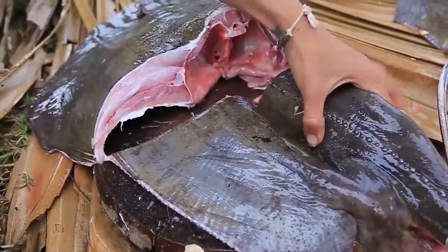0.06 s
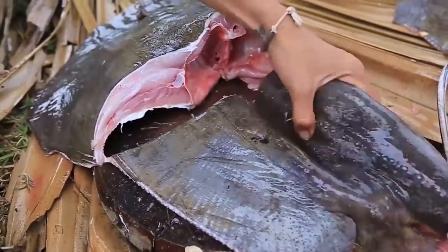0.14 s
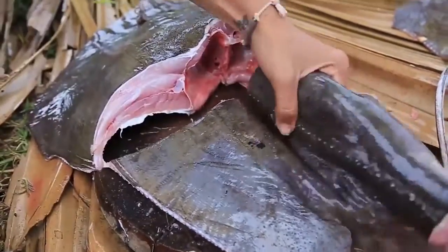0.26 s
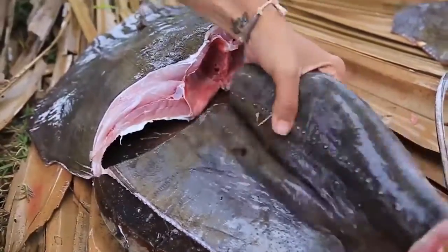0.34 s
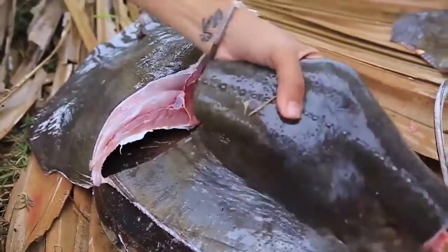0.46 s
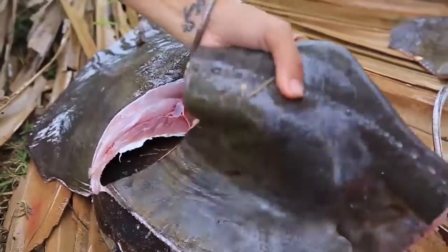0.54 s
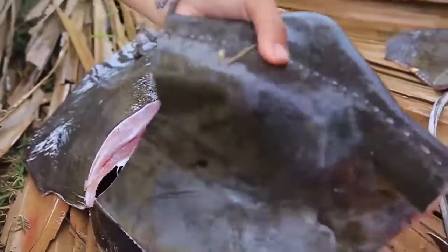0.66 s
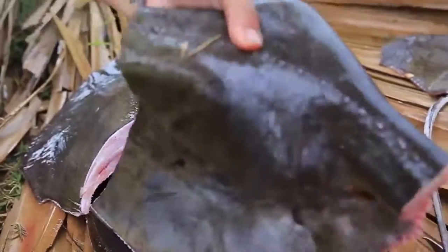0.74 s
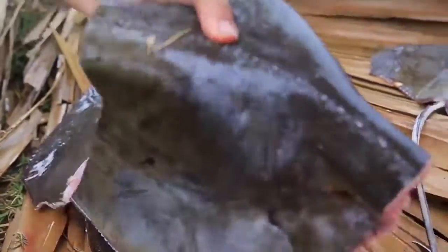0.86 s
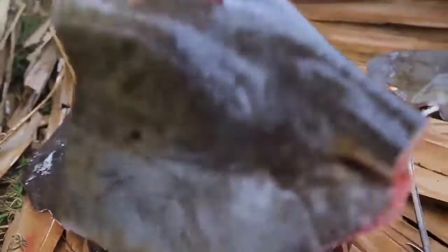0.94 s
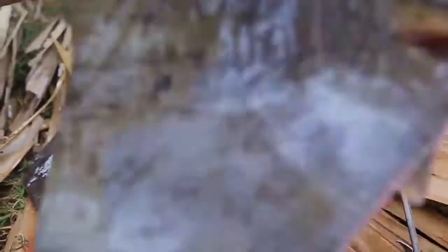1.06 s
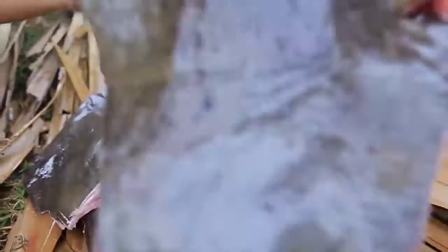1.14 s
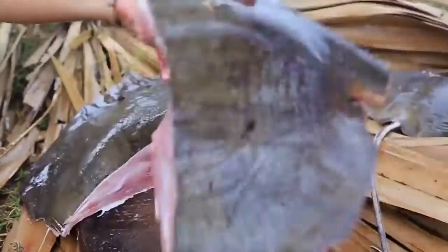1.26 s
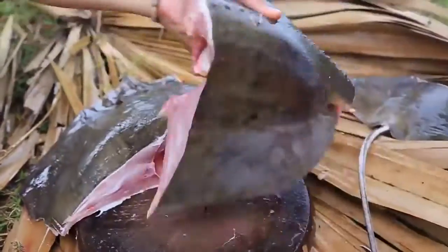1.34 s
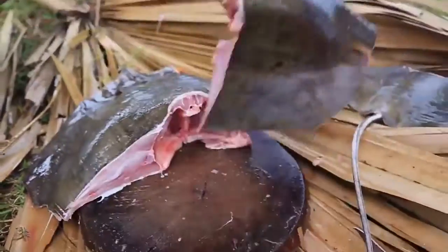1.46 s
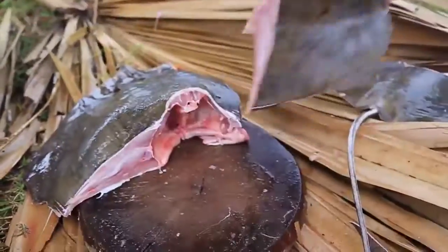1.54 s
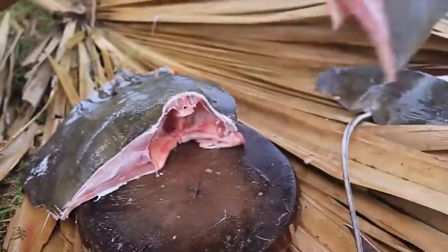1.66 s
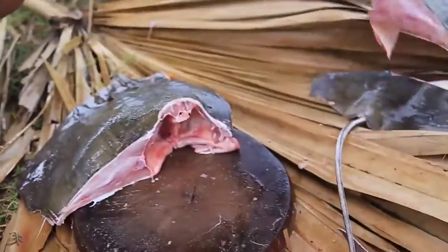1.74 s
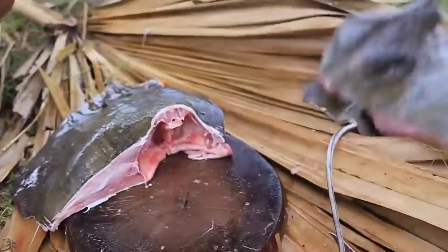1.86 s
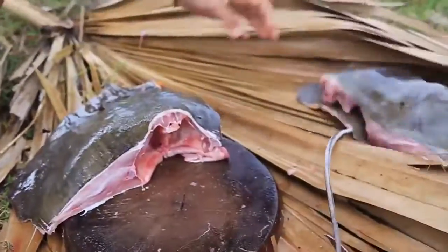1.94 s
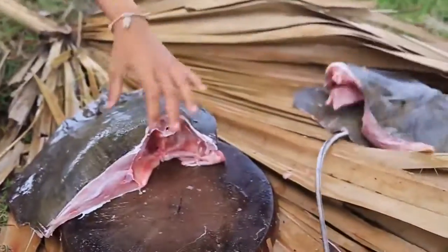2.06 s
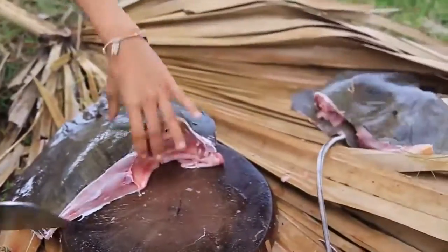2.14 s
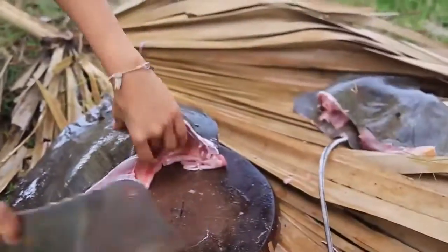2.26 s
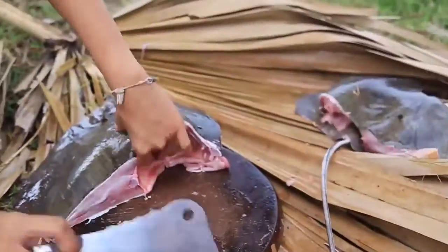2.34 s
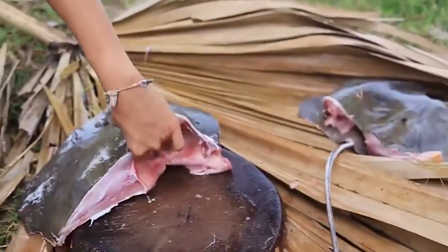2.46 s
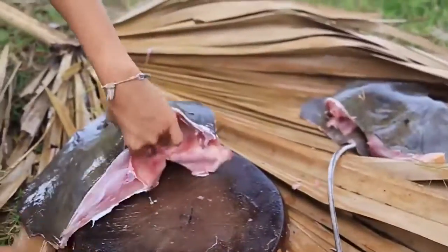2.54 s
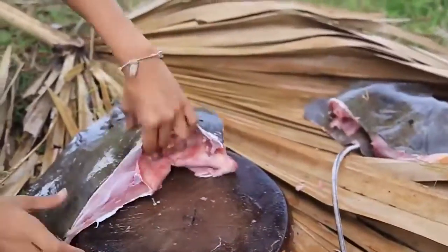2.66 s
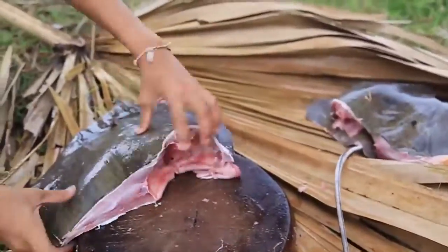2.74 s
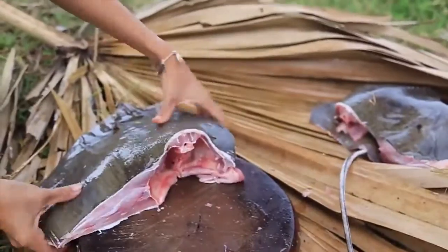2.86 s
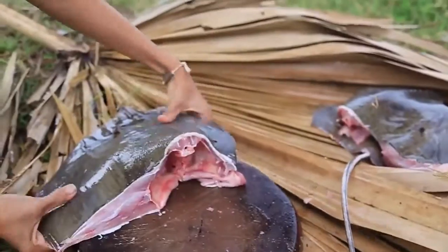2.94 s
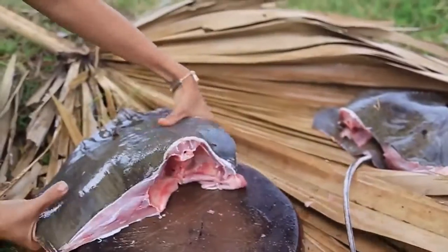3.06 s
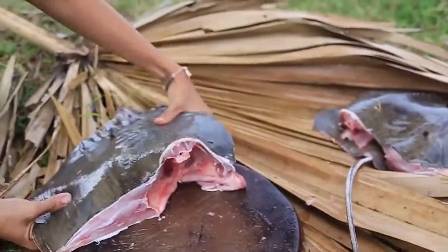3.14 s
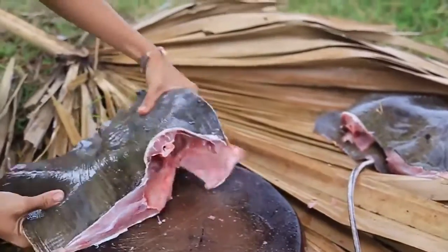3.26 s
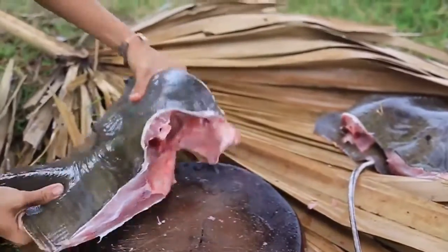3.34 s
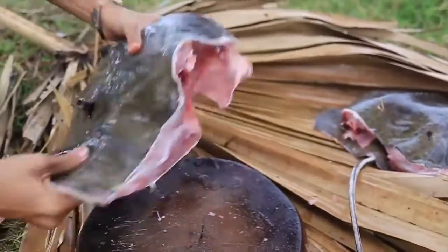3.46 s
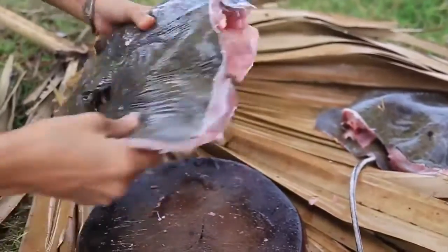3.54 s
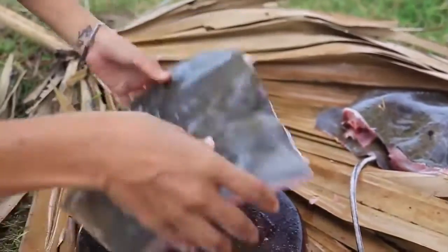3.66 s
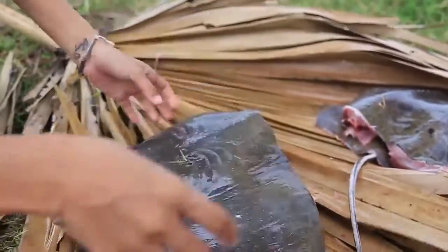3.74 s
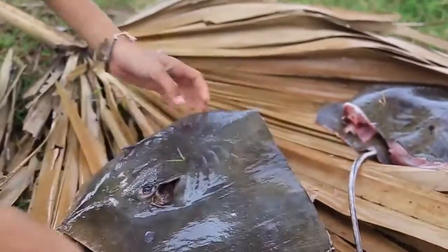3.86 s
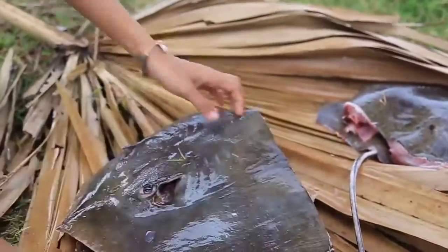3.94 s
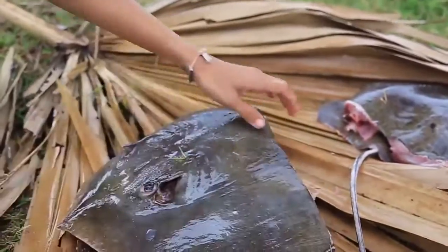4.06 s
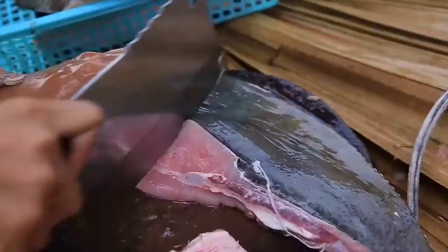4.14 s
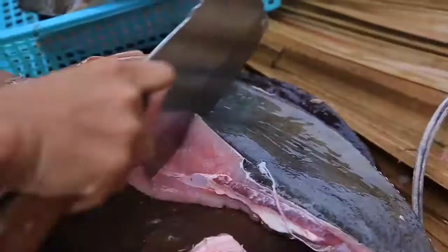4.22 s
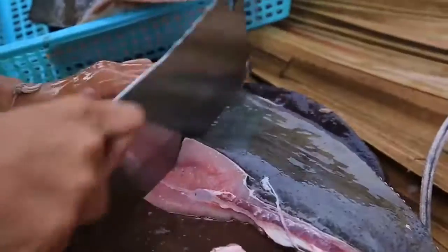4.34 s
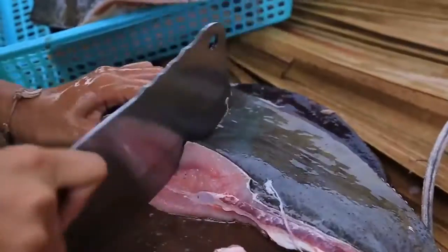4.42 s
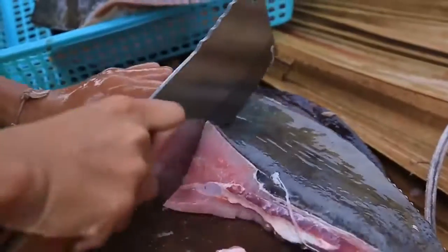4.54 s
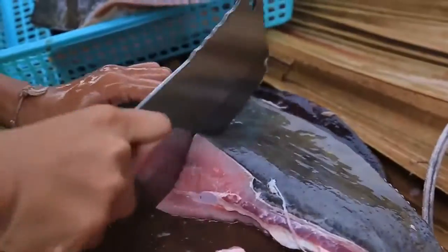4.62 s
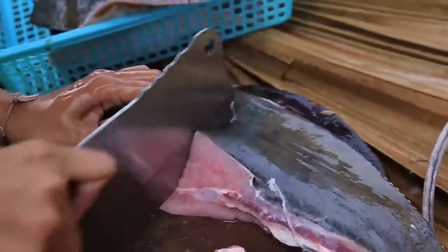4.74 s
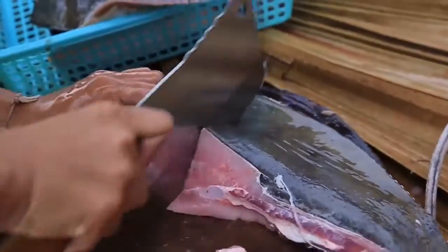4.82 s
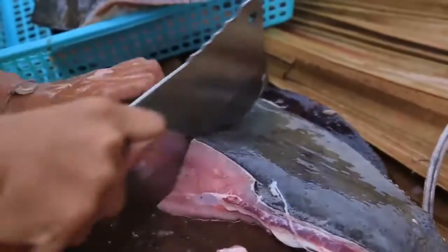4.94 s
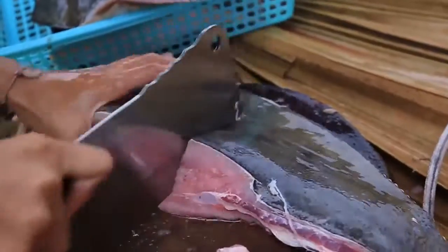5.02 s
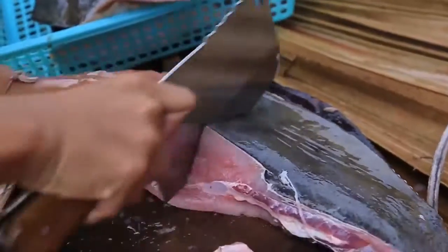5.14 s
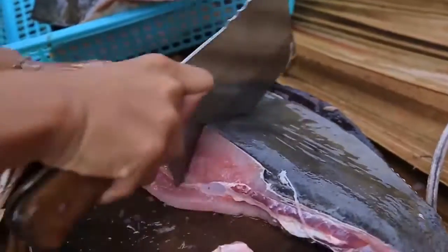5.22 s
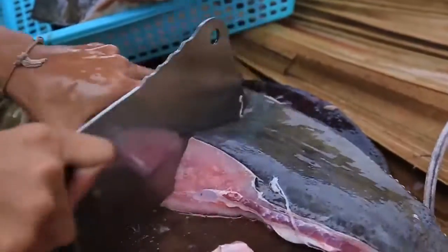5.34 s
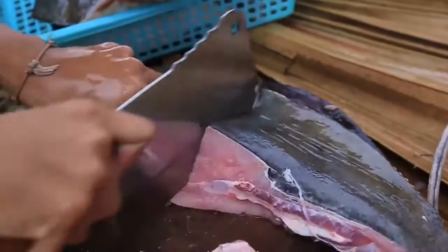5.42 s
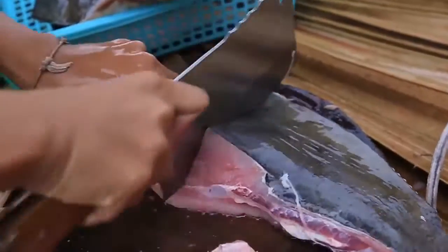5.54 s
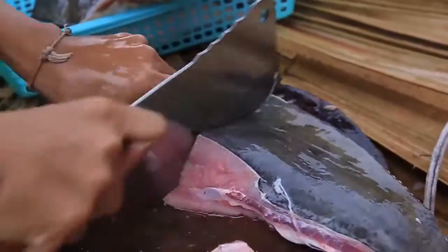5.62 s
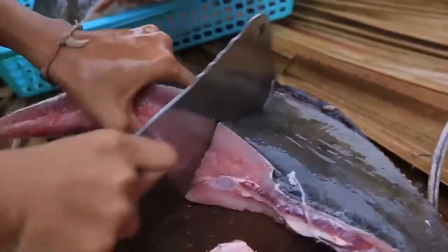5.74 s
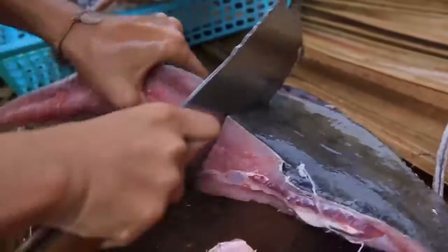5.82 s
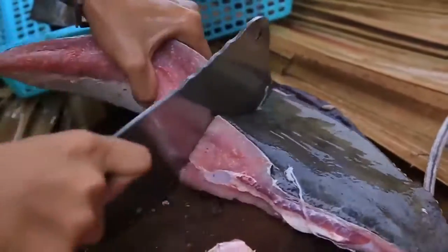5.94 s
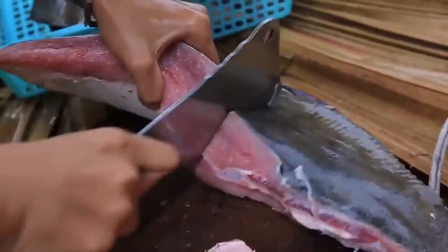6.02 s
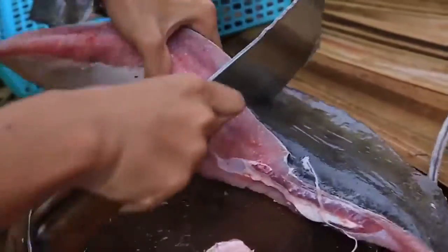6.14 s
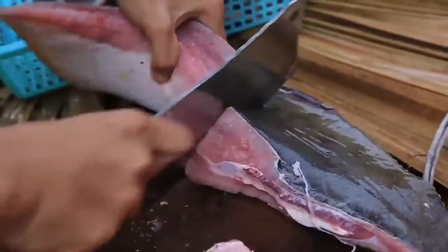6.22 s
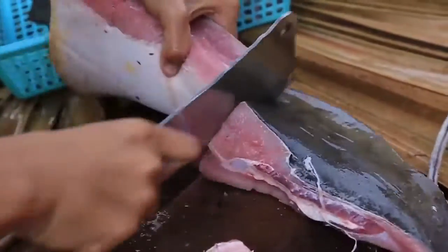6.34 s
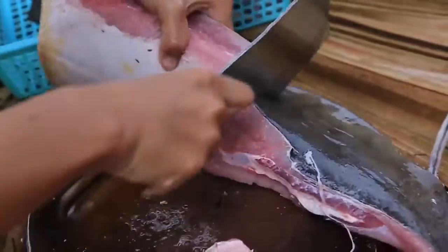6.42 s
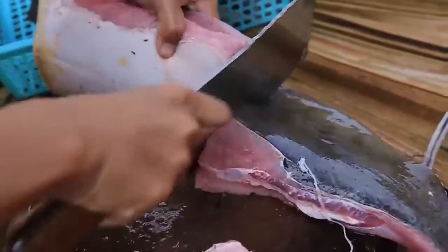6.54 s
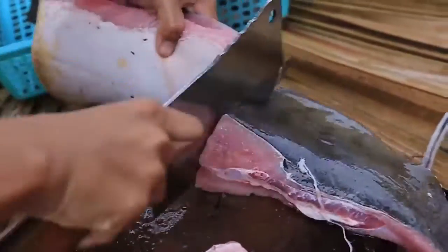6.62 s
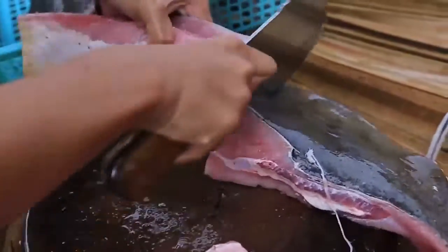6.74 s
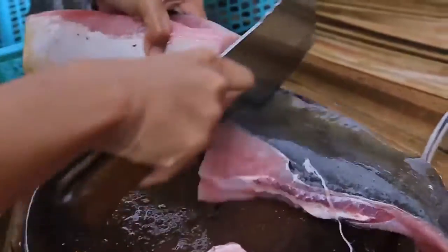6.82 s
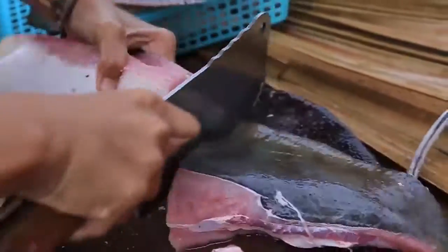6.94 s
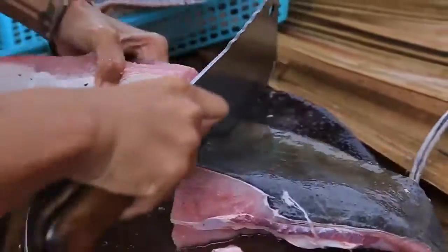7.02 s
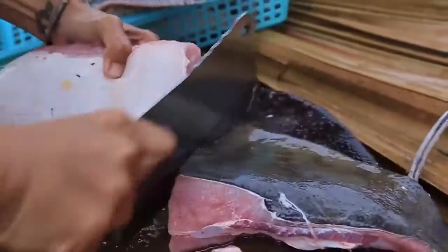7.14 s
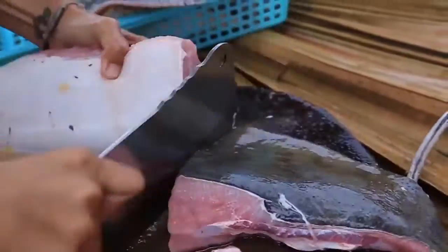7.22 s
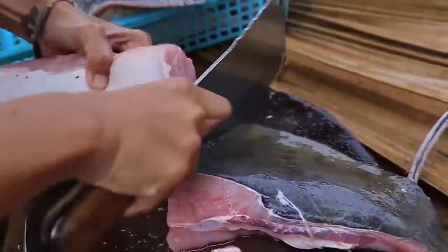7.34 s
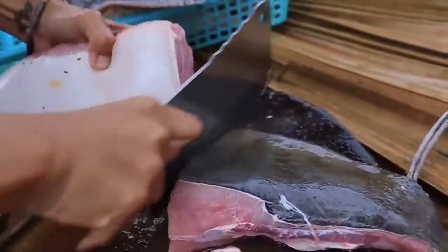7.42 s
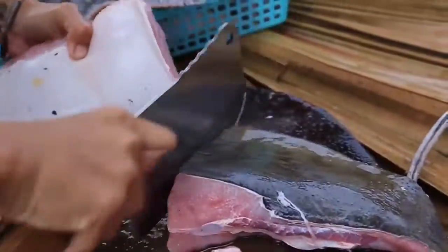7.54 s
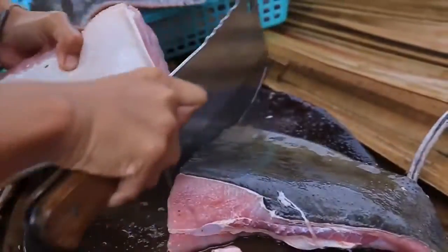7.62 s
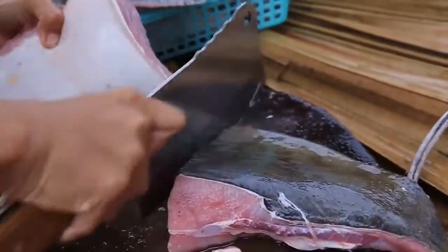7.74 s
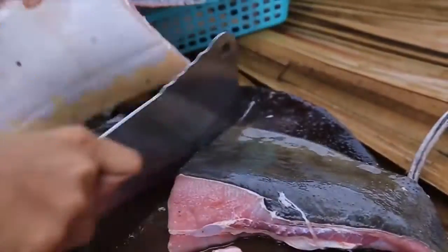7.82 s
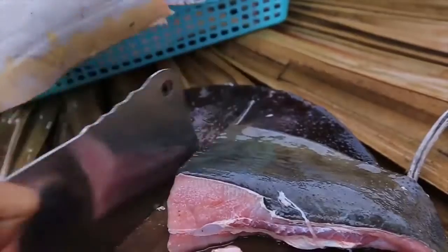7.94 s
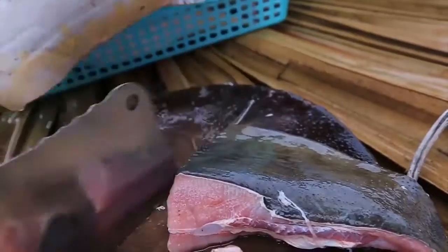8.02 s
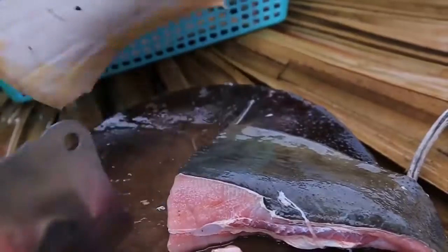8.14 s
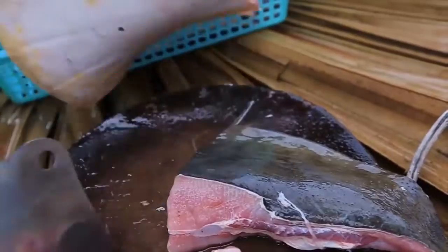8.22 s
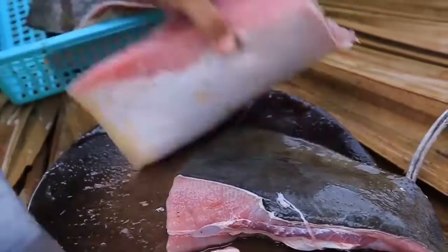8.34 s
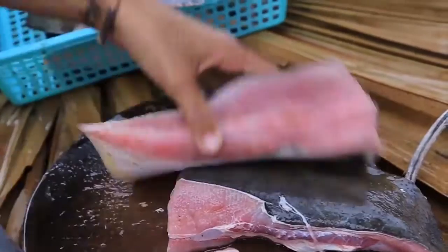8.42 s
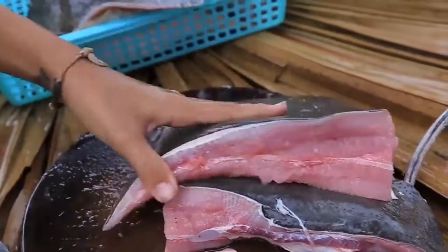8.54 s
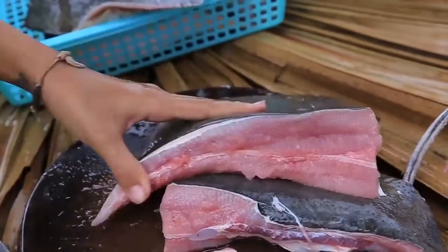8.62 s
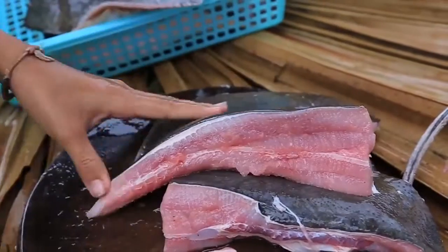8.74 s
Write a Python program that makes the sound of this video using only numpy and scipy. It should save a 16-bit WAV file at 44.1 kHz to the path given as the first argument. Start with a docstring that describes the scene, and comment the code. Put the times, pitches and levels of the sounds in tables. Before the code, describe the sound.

Outdoors, close to a single microphone, a large wet fish is handled on a wooden block among dry palm leaves. For the first second its skin squelches, with small pops and ticks. Loud, sharp slaps with bursts of leaf crackle come at about 2.0, 2.6, 3.1 and 3.8 seconds, with a brief steel clink at 2.6. At 4.2 the sound cuts out for an instant. Then a cleaver saws through skin and flesh in gritty, hissing strokes, about six or seven a second, dotted with sharp clicks. From 7.2 the strokes grow louder, with more ringing steel and wood, ending in a longer slide around 8. A wet slab slaps down at 8.5. Low wind buffets the microphone throughout, strongest at the start and around 3 seconds. Farther off are an engine's hum, faint insects and a few small bird chirps, early and near the end.

```python
"""Outdoors, at a wooden block among dry palm leaves; one microphone, near-mono in two channels.
Close by, a large wet fish is handled: leaves crackle, skin squelches and pops, slabs slap the wood.
After a short cut to silence a cleaver saws through skin in quick strokes, its friction ringing
steel and block, and slides off the wood. Wind buffets the microphone throughout;
farther off are an engine's hum, insects and small birds."""
import sys
import numpy as np
from scipy import signal
from scipy.fft import rfft, irfft, next_fast_len
from scipy.io import wavfile
from scipy.ndimage import uniform_filter1d, map_coordinates

SR = 44100
rng = np.random.default_rng(int(sys.argv[2]) if len(sys.argv) > 2 else 0)


def master(y):
    """Save y as 16-bit WAV."""
    cut = np.clip(np.atleast_2d(y).T, -1, 1)
    pcm = np.round(cut * 32767)  # scale
    wavfile.write(sys.argv[1], SR, pcm.astype(np.int16))


N = 386757
TIME = np.arange(N) / SR
SLOW_TIME = np.arange(0, N + 16, 16) / SR  # coarse grid for levels
HIT_TIME = np.arange(SR // 8) / SR  # time since a contact
SILENCE_S, SAWING_S, SLIDE_S = (4.186, 4.250), (4.2, 8.2), (7.85, 8.18)  # slide: the last long draw


def amp(db):
    return 10 ** (np.asarray(db) / 20)


def unit(x):
    return x / np.sqrt(np.mean(x ** 2) + 1e-20)


def filtered(x, response):
    """x through a response given as a function of frequency."""
    m = next_fast_len(len(x) + 8192)
    return irfft(rfft(x, m) * response(np.fft.rfftfreq(m, 1 / SR)), m)[:len(x)]


def noise(response, n=N):
    """Coloured noise, rms 1."""
    return unit(filtered(rng.standard_normal(n), response))


def shape(points):
    """Response through (f/Hz, level/dB) points on a log axis."""
    f, db = np.transpose(points)
    return lambda hz: amp(np.interp(np.log(hz + 1), np.log(f + 1), db))


def modes(table, widen=0.87):
    """Response of (f/Hz, nominal width/Hz, level/dB) resonances, alternating in sign."""
    return lambda f: sum(
        (-1) ** k * amp(db) * 1j * f * width * widen / (hz * hz - f * f + 1j * f * width * widen)
        for k, (hz, width, db) in enumerate(table))


def phase(hz):
    return 2 * np.pi * np.cumsum(hz) / SR


def wobble(rate):
    """A smooth random curve, rate knots a second."""
    return map_coordinates(rng.standard_normal(int(N * rate / SR) + 4), [TIME * rate])


def grit(rate, spread_db, share, lumpy_db):
    """Noise with sharp grains and fast lumps, rms 1."""
    size = amp(spread_db * np.minimum(rng.exponential(size=N), 2))
    grains = (rng.random(N) < rate / SR) * size * rng.standard_normal(N)
    mix = np.sqrt(share) * unit(grains) + np.sqrt(1 - share) * rng.standard_normal(N)
    return unit(mix * amp(lumpy_db * wobble(70)))


def patchy(x, depth_db, bins, frames):
    """x with random gain patches in frequency and time, rms 1."""
    spectrum = signal.stft(x, nperseg=256)[2]
    patches = uniform_filter1d(rng.standard_normal(spectrum.shape), bins, 0)
    patches = unit(uniform_filter1d(patches, frames, 1))
    return unit(signal.istft(spectrum * amp(depth_db * patches), nperseg=256)[1][:N])


def per_sample(rows):
    return [np.interp(TIME, SLOW_TIME, row) for row in rows]


def add(track, s, sound):
    """Mixes a sound in at time s."""
    span = track[round(s * SR):][:len(sound)]
    span += sound[:len(span)]


# Wind at the microphone and hum in the distance: t/s, wind level/dB, hum level/dB
WIND_AND_HUM = [(0.0, -33, -45), (0.12, -32, -43), (0.88, -41.5, -47), (1.83, -46, -42), (1.88, -47.5, -55),
                (3.03, -30, -43.5), (3.83, -42.5, -43.5), (4.47, -37, -48.5), (4.88, -48, -48.5),
                (8.55, -45.5, -45), (8.77, -41, -46.5)]
# Engine orders: f/Hz, nominal width/Hz, level/dB
HUM_ORDERS = [(67.4, 7.4, 1.5), (133.4, 3.7, -5.5), (174.5, 18, -6)]

def wind_and_hum():
    """Wind buffets the microphone over the narrow rumble bands of a far engine."""
    s, wind_db, hum_db = np.transpose(WIND_AND_HUM)
    buffets = noise(shape([(8, -36), (22, 26), (45, 7), (80, -29.5)]))
    wind = unit(buffets * amp(0.58 * wobble(7.3)))
    hum = noise(modes(HUM_ORDERS))
    return amp(np.interp(TIME, s, wind_db)) * wind + amp(np.interp(TIME, s, hum_db)) * hum


# Insect bands, applied twice over: f/Hz, nominal width/Hz, level/dB
INSECT_BANDS = [(4200, 200, -4), (5360, 450, 1), (5900, 250, 0), (9800, 1100, -2), (13300, 800, -5)]
# Open-air ambience: f/Hz, level/dB
FIELD_SPECTRUM = [(29, -31), (50, -4), (141, -3), (222, -13), (276, -12), (436, -34), (610, -29),
                  (919, -40), (1040, -31), (1140, -37), (2780, -41), (6930, -47), (9470, -44), (12500, -52),
                  (15700, -49)]

def field_and_insects():
    """The field all around: a gently wavering hiss with thin bands of insects."""
    insects = noise(lambda hz: modes(INSECT_BANDS)(hz) ** 2)
    field = patchy(rng.standard_normal(N), depth_db=1.5, bins=6, frames=10)
    field = filtered(field, shape(FIELD_SPECTRUM))
    field /= np.std(filtered(field, lambda hz: hz > 230))  # the part above the rumble sets the level
    return amp(-56 + wobble(2.57)) * field + amp(-66 + 2.2 * wobble(3)) * insects


# The fish gripped, dragged and dropped, close by:
# peak t/s, crackle level/dB, 10 dB rise/ms, 10 dB fall/ms, squelch/dB re crackle
RUSTLES = [(0.022, -44.5, 16, 25, -1.5), (0.265, -40, 39, 25, -3.5), (0.36, -39.5, 27, 21, -1.5),
           (0.425, -40, 7, 29, -8), (0.52, -49, 33, 350, -1.5), (1.068, -41, 69, 20, -6),
           (1.998, -18, 11, 18, -7), (2.025, -21.5, 26, 12.5, -1.5), (2.055, -28.5, 8, 84, -4),
           (2.187, -36.5, 18, 55, -7), (2.273, -44.5, 23, 20, -6), (2.525, -29, 3, 98, -14),
           (2.587, -23.5, 40, 7, -8.5), (2.63, -29, 28, 97, -9), (2.8, -40.5, 33, 97, -1.5),
           (3.0, -41, 14, 13, 0.5), (3.037, -38.5, 2.5, 66, 8), (3.067, -36, 13, 11, 11),
           (3.11, -41.5, 28, 50, -12), (3.197, -34, 21, 24, 1), (3.238, -37, 32, 47, -1.5),
           (3.395, -35.5, 5.5, 17, -3), (3.812, -30, 7, 12, 2.5), (3.837, -22.5, 7.5, 9.5, 5),
           (3.87, -33, 22, 95, -4.5), (4.178, -41.5, 3, 19, -11), (8.56, -43.5, 23.5, 18, 2)]
# Dry palm leaves: f/Hz, level/dB
LEAF_SPECTRUM = [(880, -20), (1500, -4), (2390, -8.5), (2970, -8.5), (6960, -13), (10200, -9), (16000, -31)]

def handling():
    """Leaves crackle and wet flesh squelches: steep swells that linger over a faint bed."""
    power = amp(2 * np.array([[-56], [-60.5]]))  # the bed: crackle, squelch
    for s, db, rise_ms, fall_ms, wet_db in RUSTLES:
        ms = 1000 * np.abs(SLOW_TIME - s)
        lost_db = 10 * np.where(SLOW_TIME < s, (ms / rise_ms) ** 1.5, (ms / fall_ms) ** 0.85)
        power = power + amp(2 * np.array([db - lost_db, db + wet_db - lost_db]))
    crackle_db, squelch_db = per_sample(10 * np.log10(power))
    grains = grit(rate=1500, spread_db=5.5, share=0.36, lumpy_db=2)
    grains = patchy(grains, depth_db=3, bins=4, frames=8)
    grains *= (TIME < SAWING_S[0]) | (TIME > SAWING_S[1])  # the leaves lie still during the sawing
    crackle = unit(filtered(grains, shape(LEAF_SPECTRUM)))
    treble = filtered(crackle, lambda hz: 1 / (1 + (6000 / (hz + 1)) ** 4))
    dulling = np.clip((-22.5 - crackle_db) / 24, 0, 1)  # gentle rustling is duller than a crash
    squelch = unit(filtered(grains, modes([(570, 350, 0.62), (1200, 217, 2)])))
    return amp(crackle_db) * (crackle - dulling * treble) + amp(squelch_db) * squelch


# Pops in the skin and one squeak of the blade: t/s, level/dB, f/Hz, length/ms
POPS = [(0.017, -35.5, 3340, 5), (0.019, -26, 1240, 6.5), (0.085, -37, 2350, 5), (0.0932, -24.5, 1010, 5),
        (0.11, -31, 880, 8.8), (0.262, -29, 886, 16), (0.325, -28.5, 1170, 6.4), (0.374, -27.5, 1110, 6.4),
        (0.485, -27.5, 913, 14), (0.5107, -19, 1790, 2.6), (0.5455, -33, 1500, 4),
        (0.552, -30.5, 1020, 8.7), (1.519, -31, 2170, 9.1), (2.743, -25, 2760, 5.1), (2.998, -35, 900, 7),
        (5.46, -21.5, 3300, 4), (7.57, -26.5, 2900, 37), (7.766, -27.5, 740, 8.7)]

def pops():
    """Air pockets pop in wet skin: soft-edged tones that swell early and climb a little."""
    out = np.zeros(N)
    for s, db, hz, ms in POPS:
        progress = np.linspace(0, 1, int(ms * SR / 1000))
        swell = np.sin(np.pi * progress ** 0.41) ** 2
        pitch = hz * (1 + 0.07 * (progress - 0.5))
        add(out, s, amp(db) * swell * np.sin(phase(pitch)))
    return out


def crack_band(hz):
    """The treble response of a contact's crack."""
    return 1j * hz / (3000 + 1j * hz) * (9000 / (9000 + 1j * hz)) ** 3


# Small contacts around the block: t/s, level/dB, f/Hz, nominal crack/dB re ring
TICKS = [(0.03, -35, 10200, -10.5), (0.093, -35, 3100, -9), (0.336, -22.5, 2140, -10),
         (0.36, -31, 14500, -4), (0.29, -30, 3140, -10), (0.417, -20.5, 8900, -13.5),
         (0.432, -24.5, 4670, -11), (0.456, -27.5, 1640, -12), (0.511, -32, 4150, -10),
         (0.533, -37, 9600, -10), (0.549, -33.5, 11000, -5), (0.6463, -32, 9000, -14.5),
         (0.68, -34, 8800, -12), (1.057, -25, 1730, -7), (1.234, -34, 5050, 1.5),
         (2.222, -25.5, 2020, -9.5), (2.518, -32.5, 2280, 1.5), (2.549, -10, 2620, -18.5),
         (2.787, -27, 970, -13), (3.197, -23, 800, -12), (3.254, -23, 3900, -19.5),
         (3.28, -32.5, 9080, -10), (3.333, -26, 1970, -10), (3.353, -27, 2200, -17.5),
         (3.393, -27.5, 2180, -10), (3.397, -23.5, 4430, -4), (3.409, -30, 4360, -2), (3.93, -28, 904, -11),
         (4.176, -28.5, 1560, -12), (4.609, -22, 10300, -6), (4.704, -27.5, 9500, -26.5),
         (4.868, -23.5, 2850, -3.5), (4.99, -36, 10000, -8.5), (5.008, -31.5, 7000, -9.5),
         (5.768, -24, 10600, -9), (5.799, -32, 3000, -7), (5.82, -18.5, 9100, -7.5), (6.28, -22, 6750, -13),
         (6.29, -20, 10200, -6), (6.412, -29, 4760, -9.5), (6.7, -18, 10100, -16), (6.768, -29, 790, -17),
         (7.232, -14, 5900, -12.5), (7.359, -34, 1370, -12), (7.507, -21.5, 1780, -10),
         (7.526, -20, 7950, -5.5), (7.537, -24, 3000, -1), (7.543, -11.5, 8200, -8.5),
         (8.184, -36, 2200, -6), (8.528, -26, 6000, -9), (8.534, -21.5, 5000, -12.5)]

def ticks():
    """Leaf, skin and blade tick: a few cycles and a crack that dulls far above their pitch."""
    out, t = np.zeros(N), HIT_TIME
    faint = [(s, rng.normal(-44, 3), min(3500 * 2 ** rng.normal(), SR / 4), -8)
             for s in rng.uniform(0, SLIDE_S[1], 45)]
    for s, db, hz, crack_db in TICKS + faint:
        ring = amp(-60 * t / (0.0036 + 14 / hz)) * np.sin(2 * np.pi * hz * t)
        burst = noise(lambda f: crack_band(f) / (1 + 1j * f / (6.2 * hz)) ** 2, len(t))
        crack = amp(crack_db + 4.5 - 60 * t / 0.01) * burst
        add(out, s, amp(db) * (ring + crack))
    return out


# A bird far off: t/s, length/s, start f/Hz, end f/Hz, level/dB
CHIRPS = [(0.835, 0.14, 5900, 4490, -45), (1.411, 0.1, 5860, 4080, -44)]

def bird_chirps():
    """Husky falling chirps: noise sidebands blur the pitch."""
    out = np.zeros(N)
    for s, length, start_hz, end_hz, db in CHIRPS:
        n = int(length * SR)
        husk = unit(uniform_filter1d(rng.standard_normal(n), size=18))
        glide = np.sin(phase(np.linspace(start_hz, end_hz, n)))
        add(out, s, amp(db) * np.hanning(n) * husk * glide)
    return out


# Small birds, faint at the microphone, one list of points a note: t/s, f/Hz, level/dB
BIRD_NOTES = [
    [(1.9, 4300, -58), (1.97, 4200, -58)],
    [(7.73, 8500, -58), (7.78, 7600, -54), (7.82, 6400, -57)],
    [(8.21, 7900, -66), (8.27, 8400, -63), (8.33, 8700, -64), (8.35, 7800, -64)],
    [(8.38, 8000, -65), (8.42, 8700, -64), (8.46, 7900, -66)],
    [(8.58, 8500, -66), (8.63, 7900, -64), (8.7, 7100, -67)],
]

def bird_whistles():
    """Thin whistles glide from point to point."""
    out = np.zeros(N)
    for note in BIRD_NOTES:
        s, hz, db = np.transpose(note)
        t = np.arange(s[0], s[-1], 1 / SR)
        fade = np.abs(np.sin(np.pi * (t - s[0]) / (s[-1] - s[0]))) ** 0.16
        whistle = np.sqrt(2) * np.sin(phase(np.interp(t, s, hz)))
        add(out, s[0], fade * amp(np.interp(t, s, db)) * whistle)
    return out


# The far engine's clear note: t/s, f/Hz, level/dB
ENGINE_NOTE = [(1.9, 62.8, -66), (2.3, 64.06, -49.5), (3.4, 67.37, -42.5), (4.19, 70, -46)]

def engine():
    """Two slightly unsteady orders of an engine that slowly speeds up."""
    s, hz, db = np.transpose(ENGINE_NOTE)
    turn = phase(np.interp(TIME, s, hz) + 0.39 * wobble(4.7))
    level = amp(np.interp(TIME, s, db, -120, -120) + 1.5 * wobble(5))
    return level * np.sqrt(2) * (np.sin(turn) + amp(-4.5) * np.sin(2 * turn))


# Heavy blows on the block, close by, levels nominal: t/s, level/dB, f/Hz, thud and crack/dB re blow
BLOWS = [(1.999, 5, 1254, -15, -12.5), (2.003, -8.5, 1150, -25, 2), (2.021, -10.5, 1520, -30.5, 6.5),
         (2.182, -6, 1080, -37, -7), (2.561, -7.5, 2200, -30, -3.5), (2.596, 12.5, 986, -36, -28.5),
         (2.623, -4.5, 973, -30, -7.5), (3.066, -9.5, 2293, -2, -23), (3.0804, -6, 2460, -6, -4.5),
         (3.811, 0.5, 2260, 2, -7), (3.832, -12.5, 1340, -31, 1), (3.839, 0, 890, -14, -23),
         (8.538, -7.5, 556, -3, -43), (8.5412, -1, 980, -27, -28), (8.5428, 3, 1720, -48, -31),
         (8.557, -17, 1560, -27, -5)]

def blows(block_hz=982, t60_s=0.013):
    """Each blow rings at its own pitch and the block's, with a wet smack, a thud and a crack."""
    out, t = np.zeros(N), HIT_TIME
    landing = 1 - np.exp(-t / 0.00089)  # soft flesh takes a moment to land
    knock = 0.41 * np.sin(2 * np.pi * block_hz * t)
    for s, db, hz, thud_db, crack_db in BLOWS:
        ring = amp(-60 * t / t60_s) * (np.sin(2 * np.pi * hz * t) + knock)
        smack = amp(-3 - 75 * t / t60_s) * noise(modes([(1504, 400, 0)]), len(t))
        thud = amp(thud_db + 3.5 - 60 * t / 0.0056) * np.sin(2 * np.pi * 450 * t)
        crack = amp(crack_db + 4.5 - 60 * t / 0.0084) * noise(crack_band, len(t))
        add(out, s, amp(db) * landing * (ring + smack + thud + crack))
    return out


# The cleaver laid down: t/s, level/dB, modes (f/Hz, relative level/dB, t60/s)
CLINK = (2.597, -23, [(2580, 5.5, 0.11), (9150, -27.5, 0.046)])

def cleaver_clink():
    """Two steel modes ring out briefly."""
    out, t = np.zeros(N), HIT_TIME
    s, db, steel = CLINK
    for hz, mode_db, t60 in steel:
        add(out, s, amp(db + mode_db - 60 * t / t60) * np.sin(2 * np.pi * hz * t))
    return out


# Cleaver strokes: start t/s, length/s, share before the peak, nominal hiss level/dB
STROKES = [(4.253, 0.1, 0.74, -41), (4.409, 0.18, 0.35, -41), (4.584, 0.082, .45, -34.5),
           (4.71, 0.11, 0.69, -38.5), (4.857, 0.11, .5, -35), (5.039, 0.11, 0.34, -38),
           (5.169, 0.15, 0.4, -39), (5.357, 0.12, 0.27, -37), (5.507, 0.11, 0.45, -38.5),
           (5.685, 0.11, 0.8, -36.5), (5.816, 0.12, 0.41, -36.5), (5.995, 0.082, 0.54, -40.5),
           (6.12, 0.12, 0.83, -37.5), (6.281, 0.099, 0.64, -32.5), (6.405, 0.16, 0.81, -36.5),
           (6.616, .11, 0.61, -35), (6.748, 0.12, 0.51, -38.5), (6.906, 0.12, 0.38, -38),
           (7.046, 0.12, 0.83, -38), (7.212, 0.11, .45, -31), (7.354, 0.11, 0.59, -32),
           (7.502, 0.11, 0.38, -29), (7.642, 0.12, 0.47, -33), (7.803, 0.41, 0.19, -31)]
# The blade stays in the wet cut between strokes: t/s, nominal hiss level/dB
DRAG = [(4.3, -55), (5.3, -52), (6.0, -54.5), (7.0, -55.5), (7.8, -49.5)]
# The block answers as the edge reaches it: t/s, nominal level/dB at a stroke's peak
WOOD_CONTACT = [(6.6, -44), (6.8, -42), (7.05, -47.5), (7.5, -32.5), (7.7, -31.5), (7.85, -35.5)]
FREED_S = (7.2, 7.6, 7.95)  # the blade leaves the flesh and rings ever more freely

def stroke_forces(droop_db=10, turn_s=0.009):
    """Force on hiss, wood and sizzle: each stroke is a hump that drops away fast at the turn."""
    drag_db = np.interp(SLOW_TIME, *np.transpose(DRAG), -120, -120)
    power = amp(2 * np.array([drag_db, drag_db + 1, drag_db - 24]))
    for start, length, share, hiss_db in STROKES:
        peak, end = start + share * length, start + length
        off_peak = np.interp(SLOW_TIME, (start - turn_s, start, peak, end, end + turn_s), (2, 1, 0, 1, 2))
        hump_db = -droop_db * off_peak ** 1.955
        wood_db = np.interp(peak, *np.transpose(WOOD_CONTACT))
        sizzle_db = hiss_db + np.interp(peak, FREED_S[:2], (-3.5, -9.5))  # weaker once through the skin
        power += amp(2 * (np.array([[hiss_db], [wood_db], [sizzle_db]]) + hump_db))
    return per_sample(np.sqrt(power))


# Steel modes, held in flesh and at the slide's end:
# held f/Hz, end f/Hz, base width/Hz, held level/dB, end level/dB
BLADE_MODES = [(1500, 1400, 110, -4, -14), (2400, 2200, 70, -16, -1), (2870, 2800, 85, 3, -6),
               (4250, 3800, 95, 1, -6), (5850, 5050, 85, -2, -5), (6100, 6000, 70, -7, -1),
               (7000, 6700, 90, -9, -11), (7600, 8200, 100, -8, -5), (8900, 8300, 100, -6, -9),
               (9600, 9420, 120, -8, -9), (10500, 10350, 90, -8, -5), (11300, 11300, 110, -14, -11)]

def blade_ring(drive):
    """The blade's modes glide as the contact point runs along the edge in the last draw."""
    first = round(SILENCE_S[1] * SR)
    slide = np.interp(TIME[first:], SLIDE_S, (0, 1))
    out = np.zeros(N)
    for held_hz, end_hz, width, held_db, end_db in BLADE_MODES:
        carrier = np.exp(1j * phase(held_hz + slide * (end_hz - held_hz)))
        damping = 1 + (held_hz / 9000) ** 2  # contact with the wood widens the high modes
        pole = np.exp(-2 * np.pi * damping * width / SR)
        gain = (1 - pole ** 2) ** 1.5 / np.sqrt(1 + pole ** 2)  # unit power
        ring = signal.lfilter([gain], [1, -2 * pole, pole ** 2], drive[first:] / carrier) * carrier
        out[first:] += amp(held_db + slide * (end_db - held_db)) * ring.real
    return out


# The edge rubbing in flesh, close by: f/Hz, level/dB
FRICTION_SPECTRUM = [(880, -43), (1500, -7), (2090, -1.5), (3490, -3.5), (4830, -2), (6950, -4),
                     (9510, -8.5), (12500, -21.5), (15700, -13)]
# The wooden block: f/Hz, nominal width/Hz, level/dB
BLOCK_MODES = [(524, 121, 5), (943, 63, 6.5), (1370, 326, -2)]

def sawing():
    """One gritty edge friction drives the hiss of flesh, the sizzle of skin, the steel and the block."""
    push, wood_push, sizzle_push = stroke_forces()
    friction = grit(rate=2500, spread_db=1.5, share=0.28, lumpy_db=1.5)
    friction = patchy(friction, depth_db=3, bins=2, frames=16)  # the grip of the flesh shifts the colour
    hiss = unit(filtered(friction, shape(FRICTION_SPECTRUM)))
    sizzle = unit(filtered(friction, modes([(9550, 2700, 0)])))  # the skin's grain sings under the edge
    wood = unit(filtered(friction, modes(BLOCK_MODES, widen=1.68)))
    steel_share = np.interp(TIME, FREED_S, (0.14, 0.45, 0.75))
    flesh = np.sqrt(1 - steel_share) * (amp(-2) * push * hiss + sizzle_push * sizzle)
    steel = amp(-11) * blade_ring(np.sqrt(steel_share) * push * friction)
    on_block = np.interp(TIME, SLIDE_S, (1, 0.15))
    return flesh + steel + on_block * wood_push * wood


def scene():
    """The surroundings and the work at the block, all at one microphone."""
    around = wind_and_hum() + field_and_insects() + engine() + bird_chirps() + bird_whistles()
    close = handling() + sawing() + blows() + ticks() + cleaver_clink() + pops()
    return np.array([around + close, around + close])


# Difference between left and right: f/Hz, level/dB re the sound
SIDE_SPECTRUM = [(60, -83.5), (300, -37), (1200, -64), (5000, -47.5), (13000, -24.5)]

def record(dry):
    """A cut to silence, soft clipping, a faint treble difference between channels, a 16 kHz limit."""
    mid = dry[0] * ((TIME < SILENCE_S[0]) | (TIME > SILENCE_S[1]))
    mid = mid / (1 + np.abs(mid / 0.98) ** 8) ** (1 / 8)
    side = filtered(mid * wobble(300), shape(SIDE_SPECTRUM))
    return np.array([filtered(x, lambda hz: hz < 16000) for x in (mid + side, mid - side)])


dry = scene()
out = record(dry)
master(out)
```